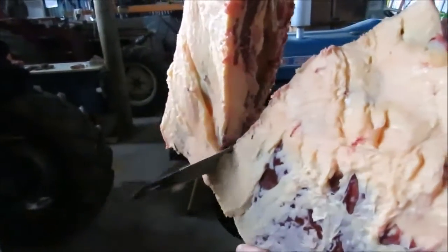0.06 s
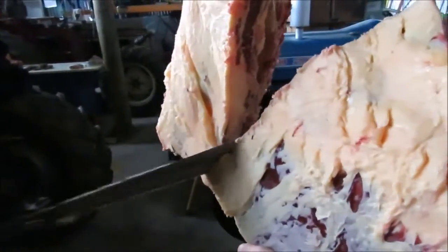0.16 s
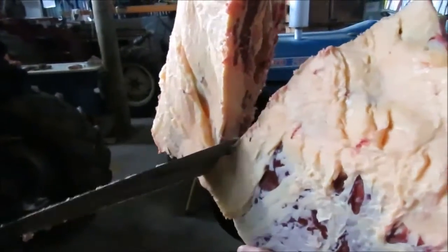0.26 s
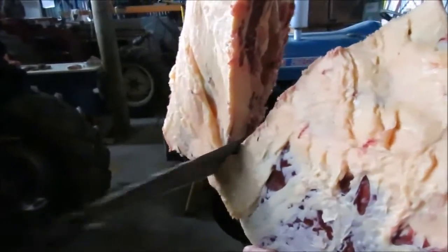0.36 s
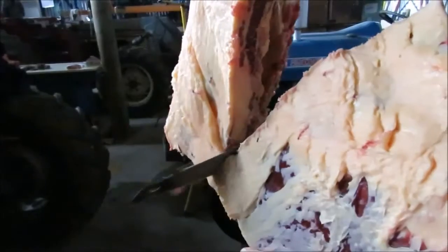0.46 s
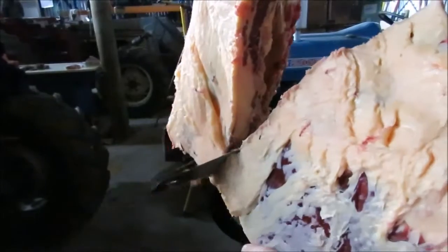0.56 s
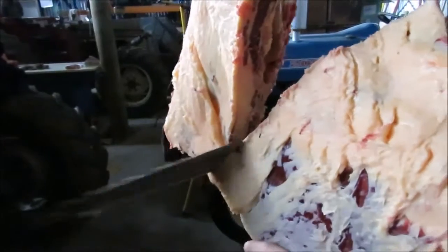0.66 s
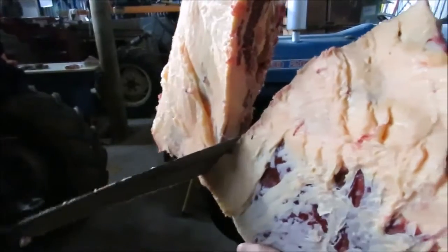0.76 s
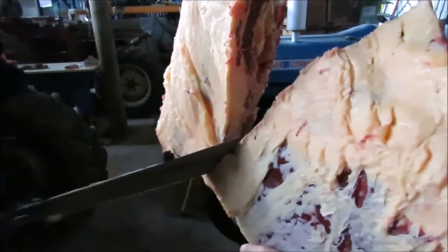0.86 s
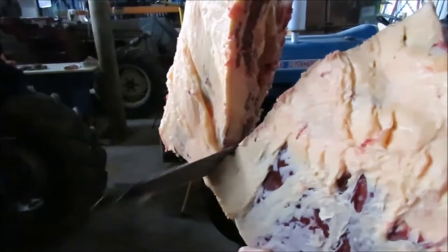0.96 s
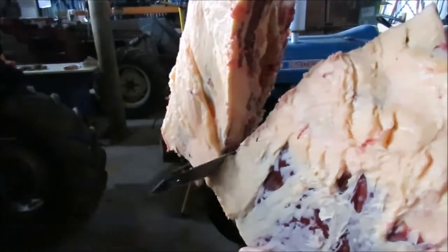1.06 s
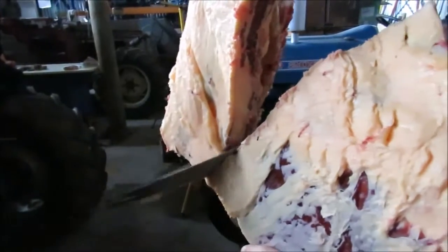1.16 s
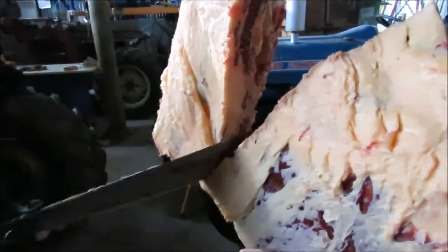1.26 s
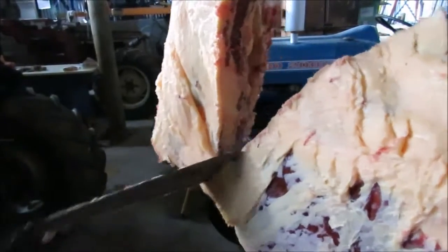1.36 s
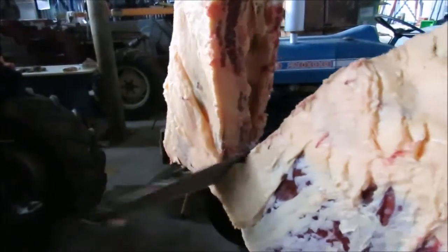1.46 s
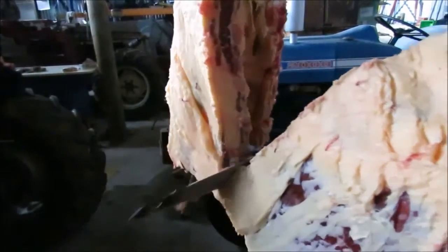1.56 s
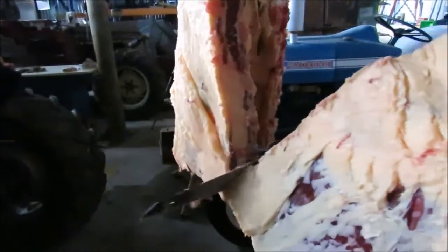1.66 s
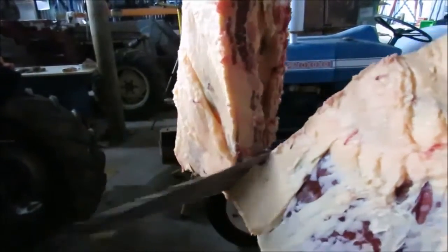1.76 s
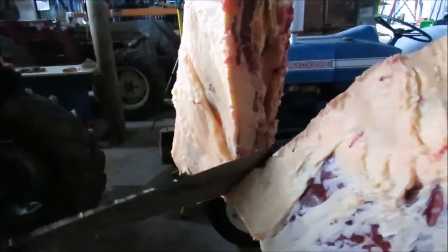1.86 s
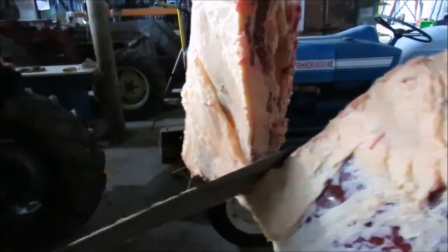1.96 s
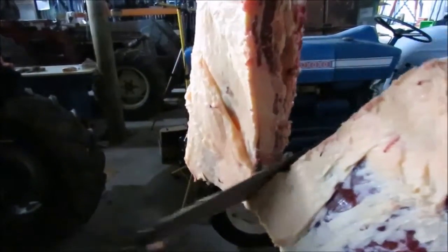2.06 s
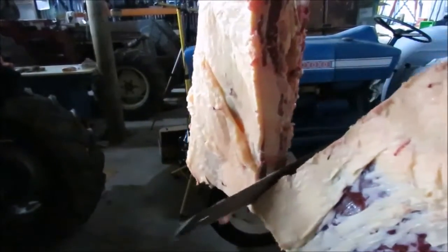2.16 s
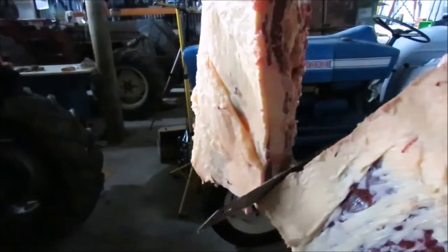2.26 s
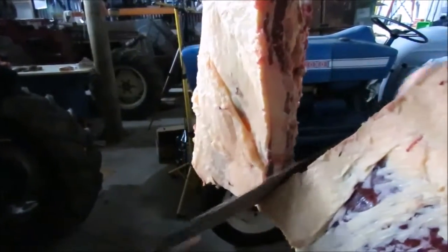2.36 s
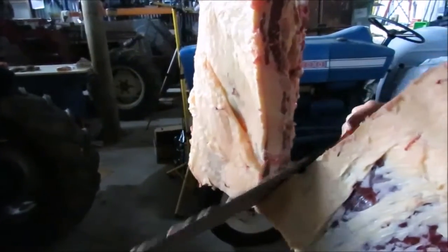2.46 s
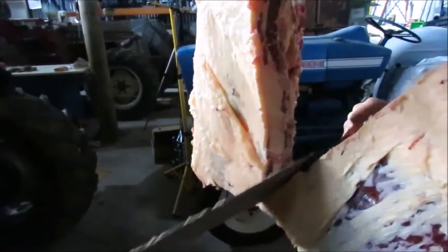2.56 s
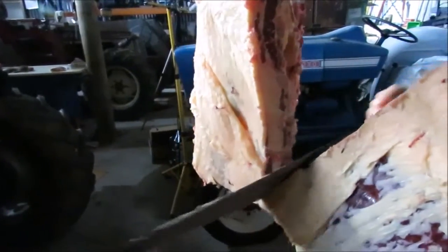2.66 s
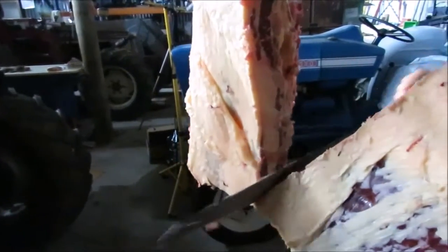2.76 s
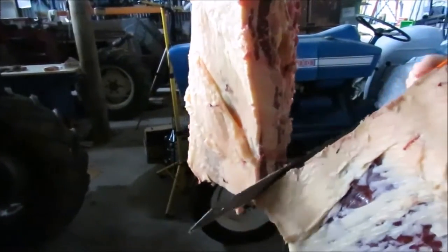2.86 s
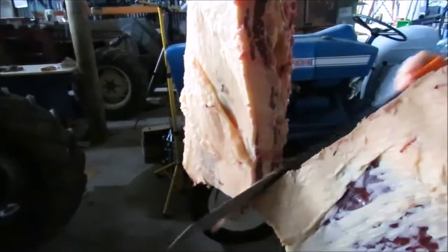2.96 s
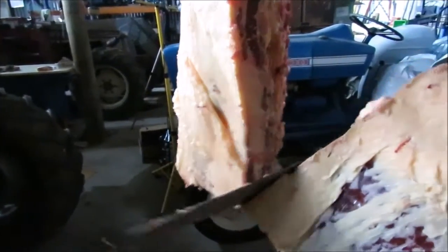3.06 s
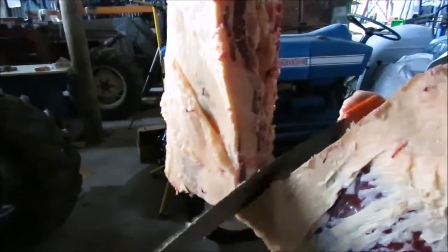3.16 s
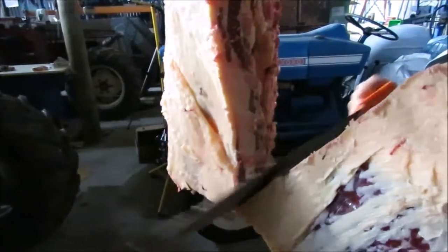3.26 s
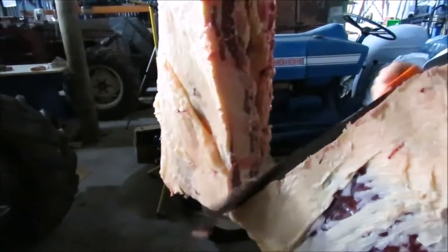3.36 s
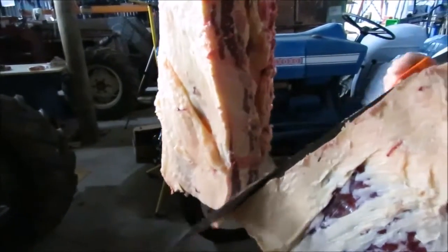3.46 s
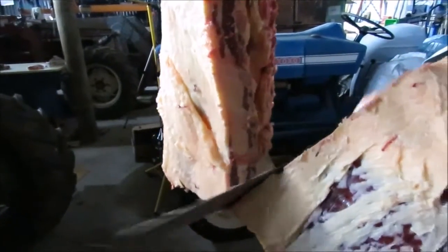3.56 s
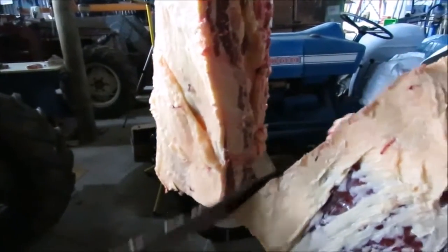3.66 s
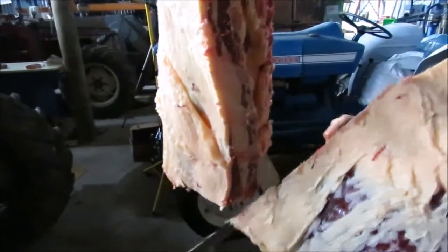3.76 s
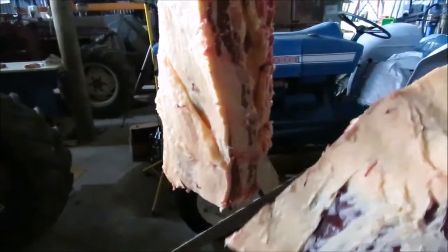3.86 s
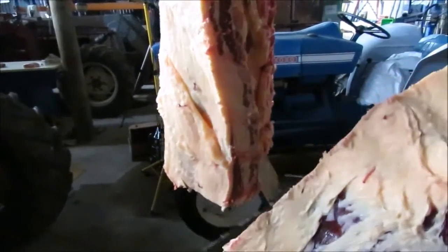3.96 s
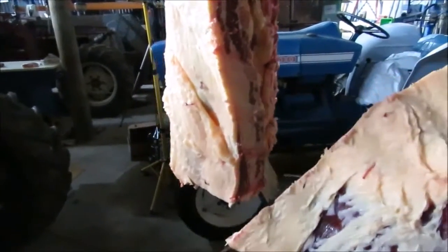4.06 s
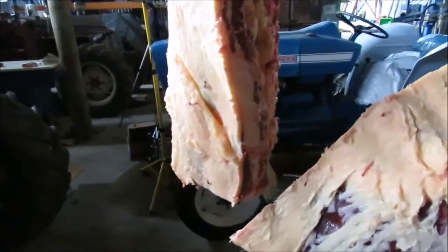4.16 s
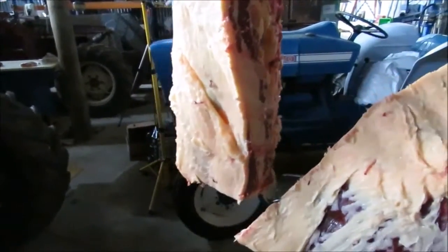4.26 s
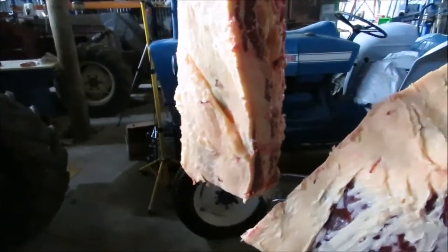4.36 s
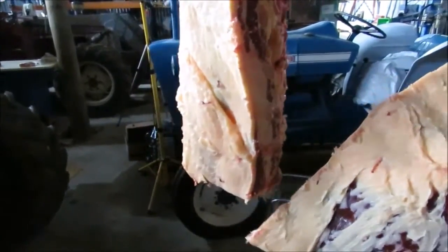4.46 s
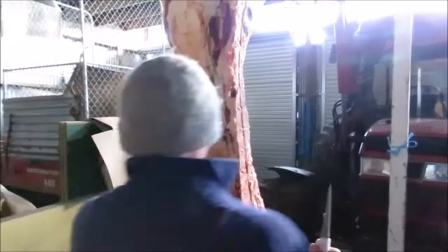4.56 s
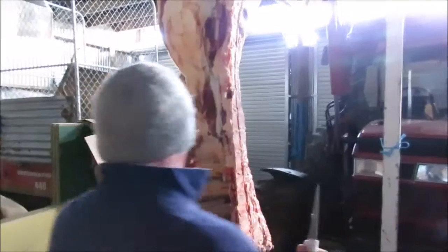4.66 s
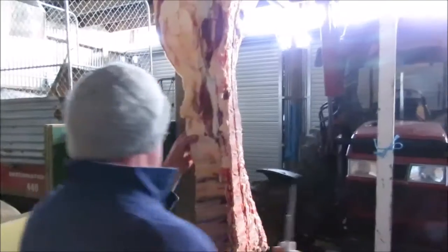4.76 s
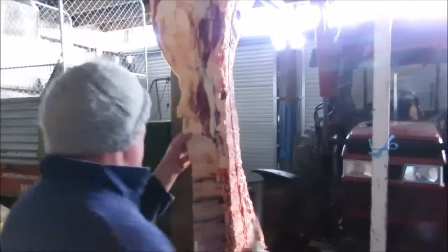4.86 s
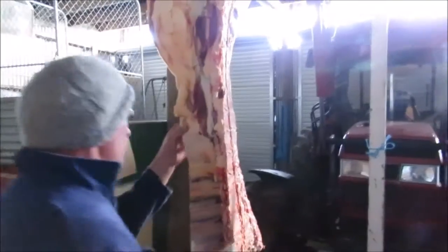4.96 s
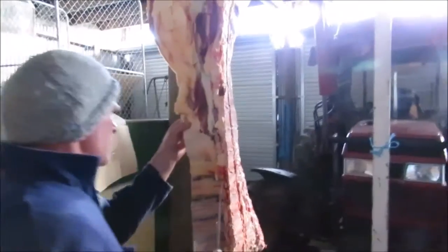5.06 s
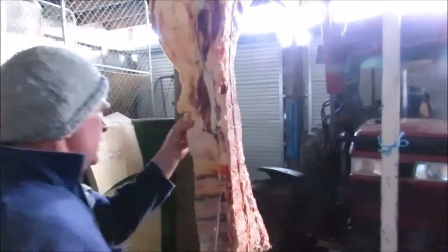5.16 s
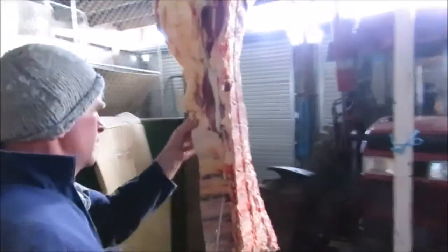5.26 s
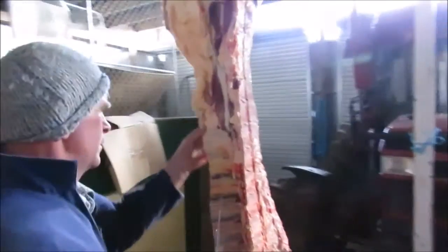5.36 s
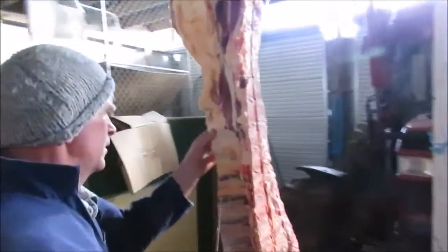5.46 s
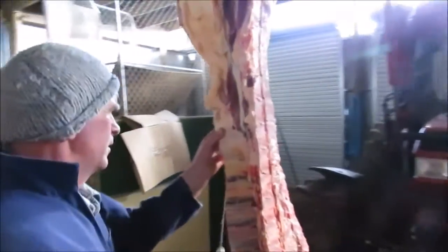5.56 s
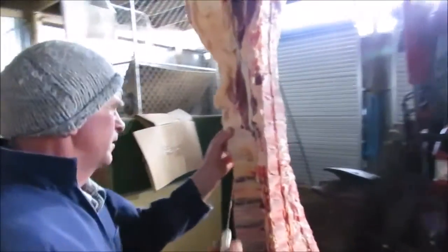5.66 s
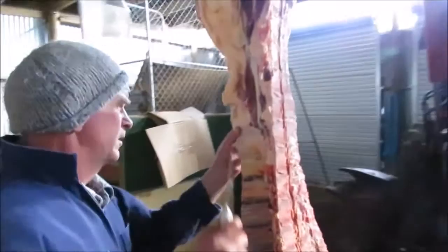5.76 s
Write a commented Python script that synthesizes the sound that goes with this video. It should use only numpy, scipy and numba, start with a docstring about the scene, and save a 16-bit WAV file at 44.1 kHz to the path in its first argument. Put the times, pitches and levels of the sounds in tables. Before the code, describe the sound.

Loud, dry-sounding sawing through beef bone, each harder stroke answered by a softer return, with gritty teeth, hollow carcass thud and brittle cracks. It ends just before four seconds, leaving faint shed echo and low hush with small knocks. After an abrupt short mute, a wider, hushed shed sound begins: grainy boot and cloth movement, one bright tick, a woody scrape-knock, then near stillness.

```python
"""A hand saw cuts rib bone in a large shed, close to a small two-port microphone: noise bursts and short rings
for the teeth, heard through bone, carcass and blade. The blade snags and the last rib cracks: crunches around
a ring. The blade rests; small knocks follow, then a short silence. From a second place in the shed, with its own
hush: shuffling, grainy noise under a rustle, with a bright rustling tick, a scraping knock and a scuff.
Echo is a noise tail, hush is filtered noise."""
import sys
import numpy as np
from scipy import signal
from scipy.fft import rfft, irfft
from scipy.io import wavfile
from scipy.ndimage import uniform_filter1d
from numba import njit

SR = 44100
rng = np.random.default_rng(int(sys.argv[2]) if len(sys.argv) > 2 else 0)


def boost(x):
    """Linear amplitude factor 10**(x/20) for a level x in decibels (scalar or array-like)."""
    u = np.asarray(x, float) / 20
    return 10 ** u


def put_to_file(sound):
    """Save the sound as 16-bit audio at rate SR, in the file named by the first command-line argument."""
    columns = np.atleast_2d(sound).T  # one column per channel
    safe = np.clip(columns, -1, 1)
    whole_steps = np.round(safe * 32767)
    wavfile.write(sys.argv[1], SR, whole_steps.astype(np.int16))


N = 256662
T = np.arange(N) / SR
# silence between the two places: start_s, end_s
GAP_S = (4.414, 4.564)


def unit(x):
    """Scale to rms 1."""
    return x / np.sqrt(np.mean(x ** 2))


def colour(x, points, modes=()):
    """Minimum-phase filter through (hz, gain_db) points, plus resonant humps (hz, width_hz, hump_db)."""
    hz = np.fft.rfftfreq(4096, 1 / SR) + 1
    point_hz, point_db = np.transpose(points)
    gain_db = np.interp(np.log(hz), np.log(point_hz), point_db)
    for centre_hz, width_hz, hump_db in modes:
        gain_db = gain_db + hump_db / (1 + (2 * (hz - centre_hz) / width_hz) ** 2)
    cepstrum = irfft(np.log(boost(gain_db)))
    cepstrum[1:2048] *= 2  # fold to causal
    cepstrum[2049:] = 0
    impulse = irfft(np.exp(rfft(cepstrum)))
    return signal.fftconvolve(x, impulse)[:len(x)]


def band(x, lo_hz, hi_hz, order=2):
    """Butterworth band-pass."""
    edges_hz = [lo_hz, min(hi_hz, .45 * SR)]
    return signal.sosfilt(signal.butter(order, edges_hz, "band", fs=SR, output="sos"), x)


def lowpass(x, hz, order):
    """Butterworth low-pass."""
    return signal.sosfilt(signal.butter(order, hz, fs=SR, output="sos"), x)


def walk(rate_hz):
    """Random levels held 1 / rate_hz and slewed twice; spread near 1."""
    hold = int(SR / rate_hz)
    steps = np.repeat(rng.standard_normal(N // hold + 1), hold)
    return unit(uniform_filter1d(uniform_filter1d(steps, hold), hold)[:N])


def bites(rate_hz, spread_db, ring_s, rub):
    """Uneven bites, each a dying burst of noise over steady rubbing."""
    size = boost(spread_db * np.minimum(rng.exponential(size=N), 4))
    hits = (rng.random(N) < rate_hz / SR) * size
    push = signal.lfilter([1], [1, -np.exp(-1 / (ring_s * SR))], hits)
    return unit((rub + unit(push)) * rng.standard_normal(N))


@njit
def grains(start, hz, cycles, size, count):
    """Sum of rings, each falling by 1/e in its number of cycles."""
    out = np.zeros(count)
    for k in range(len(start)):
        turn = np.exp((2j * np.pi - 1 / cycles[k]) * hz[k] / SR)
        z = size[k] + 0j
        for i in range(start[k], min(count, start[k] + int(6 * cycles[k] * SR / hz[k]))):
            out[i] += z.imag
            z *= turn
    return out


def teeth(centre_hz, rate_hz, scatter, cycles, spread_db):
    """Single teeth catching: short rings scattered in pitch round a resonance of bone or blade."""
    chance = rng.random((int(rate_hz * N / SR), 4)).T
    start = (chance[0] * N).astype(np.int64)
    hz = centre_hz[start] * np.exp(scatter * (chance[1] + chance[2] - 1))
    size = boost(spread_db * np.minimum(-np.log(1 - chance[3]), 4)) * np.sign(chance[1] - chance[2])
    return unit(grains(start, np.minimum(hz, .4 * SR), cycles * (.5 + chance[2]), size, N))


RISE, FALL = (1.815, 2), (.95, 1.46)  # exponents (push, pull): more = sudden start, longer hold
LONGEST_FALL_S = 0.19  # then the blade waits at the turn
REST_S, REST_DB = 3.89, -50  # the blade comes to rest
# saw strokes, pull first, then alternating; each ends where the next starts:
# start_s, fastest_s, fastest_rasp_db, prior_turn_rasp_db, sizzle_above_rasp_db
STROKES = [(-.2, -0.036, -29, -47, -6), (0.073, 0.172, -14, -50, -7.5), (0.341, 0.468, -30, -42, -5),
           (0.603, 0.731, -18, -47.5, -2), (0.876, 1.035, -28.5, -44.5, -7), (1.153, 1.264, -14.5, -49, -5),
           (1.418, 1.556, -37, -48, -6.5), (1.716, 1.843, -18.5, -62, -8), (1.958, 2.158, -39, -43.5, -8),
           (2.329, 2.444, -15.5, -62, -6.5), (2.606, 2.756, -30.5, -46.5, -8),
           (2.985, 3.058, -17.5, -49.5, -6), (3.267, 3.39, -31, -55, -11.5),
           (3.512, 3.595, -20.5, -45, -11)]


def strokes(t):
    """Rasp in dB, share of full speed and sizzle in dB of the stroke under way at times t."""
    start_s, fast_s, top_db, turn_db, sizzle_db = np.transpose(STROKES)
    end_s, end_db = np.append(start_s[1:], REST_S), np.append(turn_db[1:], REST_DB)
    k = np.maximum(np.searchsorted(start_s, t) - 1, 0)
    pull = 1 - k % 2
    rise_s = (fast_s - start_s)[k]
    fall_s = np.minimum(end_s - fast_s, LONGEST_FALL_S)[k]
    up = 1 - np.clip((fast_s[k] - t) / rise_s, 0, 1) ** np.take(RISE, pull)
    down = 1 - np.clip((t - fast_s[k]) / fall_s, 0, 1) ** np.take(FALL, pull)
    rising = t < fast_s[k]
    speed, low_db = np.where(rising, up, down), np.where(rising, turn_db[k], end_db[k])
    return low_db + (top_db[k] - low_db) * speed, speed, sizzle_db[k]


STALL_DB, STALL_S, JUMP_DB, JUMP_S = 6, .015, 3.5, 0.018  # drop before a snag, jump after it
FREE_DB, STALL_RANGE_DB = -14.5, 22.5  # rasp this loud runs through snags; this much softer stalls fully


def stick(rasp_db):
    """Level change in dB: a slow blade stalls before each snag and jumps free after it."""
    change_db = np.zeros(N)
    for s, *_ in SNAGS:
        away_s = np.abs(T - s)
        stall_db, jump_db = -STALL_DB * np.exp(-away_s / STALL_S), JUMP_DB * np.exp(-away_s / JUMP_S)
        change_db += np.where(T < s, stall_db, jump_db)
    return change_db * np.clip((FREE_DB - rasp_db) / STALL_RANGE_DB, 0, 1)


SIZZLE_LEAD_S, SIZZLE_TURN_DB = 0.0074, -10.5  # blade sings early in a stroke, hushes at the turns
THUD_LAG_S, THUD_DB, THUD_SLOPE = 0.012, -36, 0.71  # carcass: late; level at rasp -30 dB, dB per dB
BONE_DB_PER_DB = 0.03  # harder strokes ring the bone more
# what the teeth are cutting: time_s, bone_ring_hz, carcass_weight_db
KERF = [(.13, 1950, -3), (.23, 2285, 5), (.46, 3260, 0.5), (.71, 2710, -3.5), (.8, 2180, 3),
        (1.01, 2300, 0.5), (1.26, 2397, 0), (1.56, 2990, 1.5), (1.83, 2197, -0.5), (2.12, 2220, 4),
        (2.44, 2600, 3), (2.76, 3620, 3.5), (3.05, 3680, 2.5), (3.12, 2500, 2), (3.4, 3550, 3.5),
        (3.6, 2306, 8.5), (3.8, 2310, 0.5)]
# saw spectrum: freq_hz, gain_db
SAW_COLOUR = [(35, -40.5), (60, -27), (146, -13.5), (307, -2), (513, -8), (727, -2.5), (1270, -2),
              (1980, -1), (2180, -16.5), (2620, -3), (2950, -11.5), (3310, -1), (7320, -11), (12200, -12.5),
              (15800, -28)]
# modes of bone and blade: centre_hz, width_hz, hump_db
BONE_MODES = [(211, 42, 5.5), (359.7, 16, 5), (780, 17.4, -2.5), (1036, 30, -1), (1924, 31, 6),
              (2100, 25, 4.5), (2282, 18, 8), (2500, 25, 5.5), (2600, 22, 5), (3183, 120, 2.5),
              (3830, 40, 7.5), (4140, 22, 1), (4326, 25, -4)]


def saw():
    """Bites ring the bone, shake the carcass and make the blade sizzle; the hand's pressure judders."""
    time_s, *columns = np.transpose(KERF)
    ring_hz, weight_db = (np.interp(T, time_s, c) for c in columns)
    rasp_db = strokes(T)[0]
    early_db, speed, free_db = strokes(T + SIZZLE_LEAD_S)
    sizzle_db = early_db + free_db + SIZZLE_TURN_DB * (1 - speed)
    thud_db = THUD_DB + THUD_SLOPE * (strokes(T - THUD_LAG_S)[0] + 30) + weight_db

    scrape = colour(bites(rate_hz=350, spread_db=1.5, ring_s=0.002, rub=1), SAW_COLOUR, BONE_MODES)
    bone = band(teeth(ring_hz, rate_hz=500, scatter=.45, cycles=14, spread_db=3), 700, 7000)
    steel = teeth(np.full(N, 12300.), rate_hz=900, scatter=0.24, cycles=18, spread_db=5)
    steel = band(steel, 9500, 14000)

    rasp = unit(band(scrape, 900, 9000, order=3))
    rasp = unit(rasp + 0.84 * bone * boost(BONE_DB_PER_DB * (rasp_db + 20)))
    thud = unit(band(scrape, 64, 900, order=3))
    sizzle = unit(band(scrape, 9000, 21000, order=3))
    sizzle = unit(sizzle + boost(0.94 * free_db + 5) * steel)  # sings most while it runs free

    mix = rasp * boost(rasp_db + walk(40)) + thud * boost(thud_db + 0.91 * walk(25.24))
    mix = mix + sizzle * boost(sizzle_db)
    judder = boost(stick(rasp_db) + 1.3 * walk(29.86))
    fade = np.clip((REST_S - T) / 0.28, 0, 1)
    return mix * judder * fade


def air(points, level_db):
    """Steady hush of the shed: coloured noise whose lows and highs waver on their own."""
    hush = unit(colour(rng.standard_normal(N), points))
    low = lowpass(hush, 450, order=2)
    return boost(level_db) * (low * boost(1.3 * walk(8.9)) + (hush - low) * boost(1.4 * walk(6)))


def stereo(mid, ports):
    """Ports differ by a smeared copy with random flutter, its level set by frequency."""
    smear = rng.standard_normal(1500) * np.exp(-T[:1500] / .005)
    smeared = signal.fftconvolve(mid, smear / np.sqrt(np.sum(smear ** 2)))[:N]
    side = colour(smeared * walk(85), ports)
    return np.array([mid + side, mid - side])


# near hush spectrum: freq_hz, gain_db
NEAR_SHED = [(15, -44.5), (25, -25), (64, -9), (170, -7.5), (205, -1.5), (228, -12.5), (1040, -19.5),
             (1180, -19.5), (1550, -27.5), (15800, -52.5)]
# near difference between the microphone ports: freq_hz, side_above_mid_db
NEAR_PORTS = [(60, -18), (110, -17), (200, -16), (380, -12), (700, -16), (1290, -16), (2380, -18),
              (4400, -16), (8120, -7), (15000, -4)]


def near_view(work):
    """First place: hush added, then spread over the two ports."""
    return stereo(work + air(NEAR_SHED, level_db=-52.5), NEAR_PORTS)


def echo(x, t60_low_s, t60_high_s):
    """Diffuse shed tail of decaying noise; the treble dies first."""
    t = T[:40000]
    tail = rng.standard_normal(len(t)) * (1 - np.exp(-t / 0.0013))
    low = lowpass(tail, 2500, order=1)
    tail = low * boost(-60 * t / t60_low_s) + (tail - low) * boost(-60 * t / t60_high_s)
    return signal.fftconvolve(x, tail / np.sqrt(np.sum(tail ** 2)))[:N]


def cracks(table, width, hold_s, t60_s, crumble):
    """Short noise crunches dying away around a ring, with a low thump and a bright tick."""
    out, t = np.zeros(N), T[:8000]
    for s, peak_db, hz, thump_db, treble_db in table:
        slow = boost(-crumble * peak_db)  # stretches hold and decay: weak catches crumble for longer
        decay = np.exp(-np.log(1000) * np.maximum(t - slow * hold_s, 0) / (slow * t60_s))
        crack = rng.standard_normal(len(t)) * decay
        crack[0] += 1.5
        parts = (band(crack, hz / width ** 2, hz * width, order=3),
                 band(crack, 160, 485),
                 band(crack, 5900, 12000))
        ring, thump, tick = (v / np.abs(v).max() for v in parts)
        i = int(s * SR)
        event = boost(peak_db) * (ring + boost(thump_db) * thump + boost(treble_db) * tick)
        out[i:i + len(t)] += event[:N - i]
    return out


THUMP_DB, THUMP_SLOPE = -35, 0.43  # thump of a snag that peaks at -16.5 dB; dB per dB
CHATTER_S, CHATTER_PERIOD_S = 3.039, .006
# teeth chattering over one ridge: first_peak_db, loss_per_tooth_db, ring_hz
CHATTER = (-7, 0.4, 4401)
# the blade snags and the rib cracks: start_s, peak_db, ring_hz, treble_above_peak_db
SNAGS = [(.104, -18, 2160, -14), (.116, -16, 1900, -20), (.174, -5.5, 2600, -20), (.188, -8, 2600, -18),
         (.547, -25, 5500, -7.5), (.655, -22, 2400, -4), (1.176, -27.5, 2200, -12), (1.212, -17, 2310, -12),
         (1.266, -3, 2300, -18), (1.369, -16.5, 1970, -8), (1.489, -28, 3640, 3), (1.767, -12, 3030, -2.5),
         (2.001, -22, 1820, -12.5), (2.019, -22, 2050, -4.5), (2.054, -24, 1440, -24),
         (2.074, -26, 3060, -25), (2.117, -28, 1290, -21), (2.147, -29, 2200, -15.5),
         (2.178, -27, 3360, -3), (2.199, -25.5, 2640, -14), (2.353, -39, 1500, -15),
         (2.385, -20, 2720, -9.5), (2.69, -21, 4460, -14.5), (2.716, -18.5, 3940, -14),
         (2.726, -20, 5500, -12.5), (2.748, -18, 4800, -14), (2.766, -11.5, 3940, -30),
         (2.871, -20, 5870, -18), (2.967, -26, 880, -25), (2.993, -11.5, 2600, 2), (3.02, -6.5, 4140, -9.5),
         (3.106, -8, 3040, -3), (3.225, -22, 4360, 2.5), (3.285, -35.5, 400, -34),
         (3.316, -26, 4270, -23.5), (3.327, -18, 4040, -19.5), (3.386, -10.5, 3330, -13),
         (3.392, -18, 2250, -18.5), (3.409, -21.5, 1630, -10), (3.441, -11.5, 4580, -18),
         (3.46, -17, 3540, -11.5), (3.526, -14.5, 3640, -15.5), (3.532, -19, 900, -30),
         (3.554, -8.5, 4260, -10.5), (3.578, -4.5, 1437, -17), (3.603, -3.5, 3190, -24.5)]


def snags(count=5):
    """Snags and chatter; a harder catch thumps the carcass only a little harder."""
    first_db, loss_db, chatter_hz = CHATTER
    chatter = [(CHATTER_S + k * CHATTER_PERIOD_S, first_db - k * loss_db, chatter_hz, -17)
               for k in range(count)]
    rows = []
    for s, peak_db, hz, treble_db in SNAGS + chatter:
        thump_db = THUMP_DB + THUMP_SLOPE * (peak_db + 16.5) - peak_db  # above peak
        rows.append((s, peak_db, hz, thump_db, treble_db))
    return cracks(rows, width=1.435, hold_s=0.00097, t60_s=0.015, crumble=0.3)


# small knocks once the rib is through, then one bright rustling tick at 5.15 s, a scraping knock and a scuff:
# start_s, peak_db, ring_hz, thump_above_peak_db, treble_above_peak_db
KNOCKS = [(4.309, -39.5, 952, -2.5, -45), (4.321, -41.5, 1100, 3.5, -43), (4.398, -35, 497, 1, -50),
          (5.152, -44.5, 2980, -20.5, 3), (5.241, -29, 1600, 3.5, -38), (5.312, -42, 700, 16, -40)]


def knocks_tick_and_scuff():
    """Crunches in a narrower band round the ring than the snags, mostly duller."""
    return cracks(KNOCKS, width=1.23, hold_s=.002, t60_s=0.05, crumble=.1)


# far hush spectrum: freq_hz, gain_db
FAR_SHED = [(15, -53.5), (25, -20), (299, -4), (361, -12), (437, -12), (572, -17), (857, -14.5),
            (1090, -21.5), (12700, -47), (15800, -68.5)]
# far difference between the microphone ports: freq_hz, side_above_mid_db
FAR_PORTS = [(60, -20), (110, -6.5), (200, -7), (380, -1), (700, -5), (1290, -7.5), (2380, -6.5),
             (4400, -6), (8120, -2), (15000, -3.5)]


def far_view(work):
    """Second place in the shed: its own hush and port difference."""
    return stereo(work + air(FAR_SHED, level_db=-45.5), FAR_PORTS)


# movements: loudest_s, level_db, rise_db_per_s, fall_db_per_s, rustle_above_level_db
SHUFFLE = [(4.642, -45.5, 197, 74, -28), (5.018, -41.5, 49, 179, -16.5), (5.17, -59, 300, 30, -8),
           (5.246, -30.5, 2500, 147, -33), (5.285, -30, 305, 176, -30), (5.42, -50, 100, 37, -22),
           (5.82, -49.5, 116, 100, -22)]
# scuff spectrum: freq_hz, gain_db
SHUFFLE_COLOUR = [(59, -43), (100, -19), (201, -2.5), (717, -12.5), (1670, -12.5), (2350, -12), (2560, -5),
                  (12300, -46.5), (15800, -72)]
# modes of what the tool scrapes: centre_hz, width_hz, hump_db
SCUFFED = [(620, 120, 5), (1100, 120, 4), (1650, 110, 6), (2050, 110, 4)]


def shuffle():
    """Grainy scuffing of boots and tool, with a thin rustle of cloth above it."""
    loudest_s, level_db, rise, fall, rustle_db = np.transpose(SHUFFLE)[:, :, None]
    drop_db = np.where(T < loudest_s, rise * (loudest_s - T), fall * (T - loudest_s))
    swell = boost(level_db - drop_db) * (T > GAP_S[1])
    grit = bites(rate_hz=610, spread_db=3.5, ring_s=0.003, rub=1)
    scuff = colour(grit, SHUFFLE_COLOUR, SCUFFED)
    body = unit(band(scuff, 300, 2620)) + unit(band(scuff, 2480, 5950)) * boost(-7)
    rustle = unit(band(grit, 6200, 13400, order=3))
    return body * swell.max(axis=0) + rustle * (swell * boost(rustle_db)).max(axis=0)


def scene():
    """Near view of the cut, then a second place in the shed."""
    work = saw() + snags() + knocks_tick_and_scuff() + shuffle()
    work = work + boost(-11.5) * echo(work, t60_low_s=0.55, t60_high_s=0.37)
    return np.where(T < GAP_S[1], near_view(work), far_view(work))


def band_limit(x):
    """A steep low-pass at the top of the band."""
    return signal.sosfilt(signal.butter(12, 16500, fs=SR, output="sos"), x)


def record(dry):
    """Mute between the two views, cut the top, clip at full scale."""
    mute = np.clip((GAP_S[0] - T) / 0.0017, 0, 1) + np.clip((T - GAP_S[1]) / 0.0027, 0, 1)
    top_cut = signal.ellip(8, .2, 80, 15800, fs=SR, output="sos")
    mix = np.clip(signal.sosfilt(top_cut, dry * mute), -1, 1)
    return band_limit(mix)


dry = scene()
out = record(dry)
put_to_file(out)
```